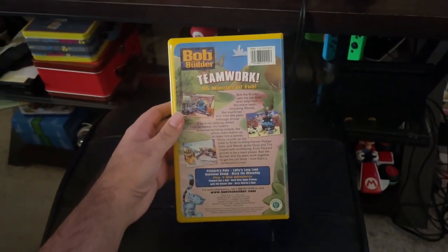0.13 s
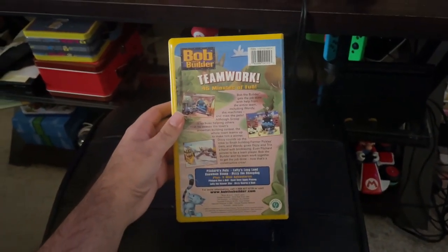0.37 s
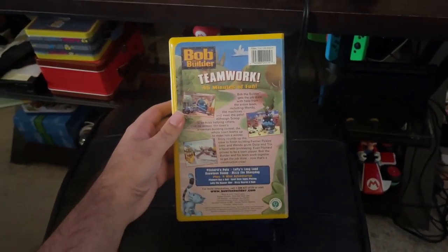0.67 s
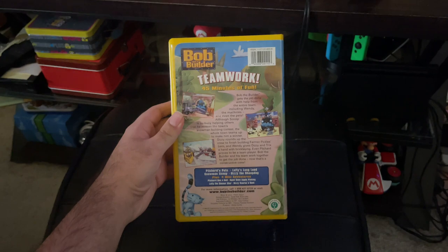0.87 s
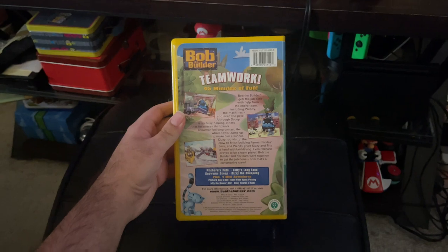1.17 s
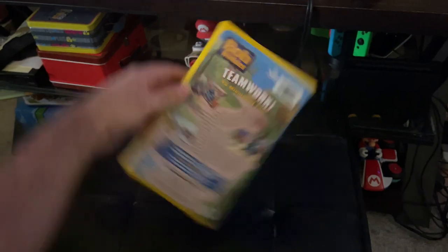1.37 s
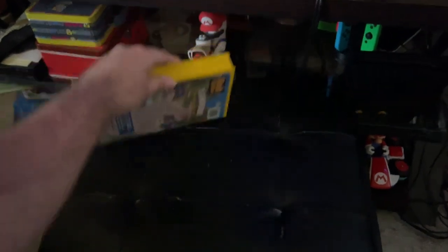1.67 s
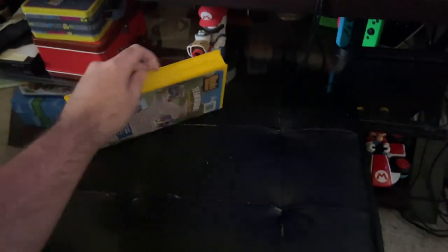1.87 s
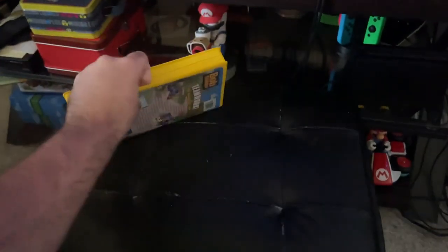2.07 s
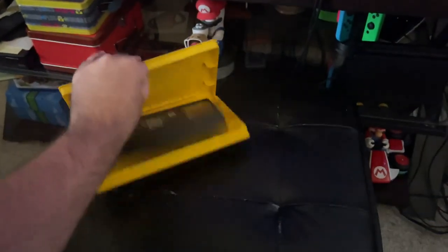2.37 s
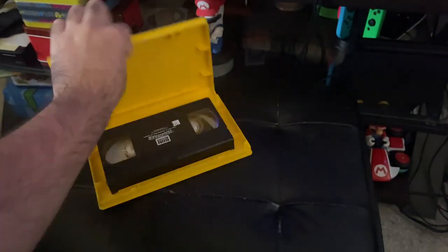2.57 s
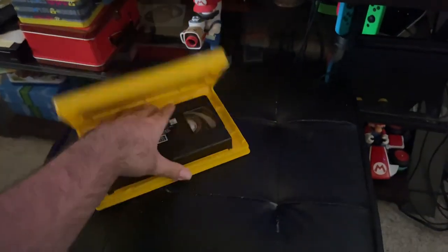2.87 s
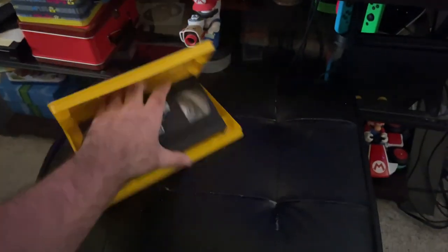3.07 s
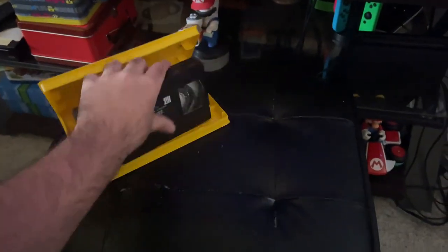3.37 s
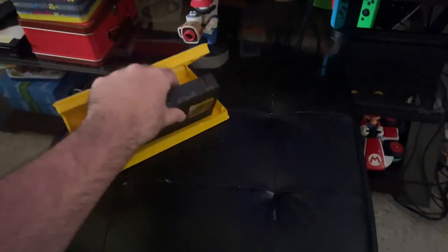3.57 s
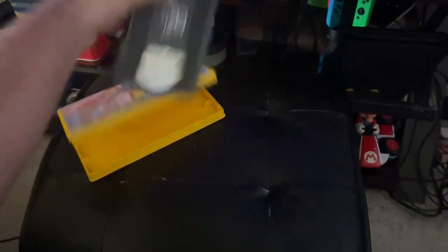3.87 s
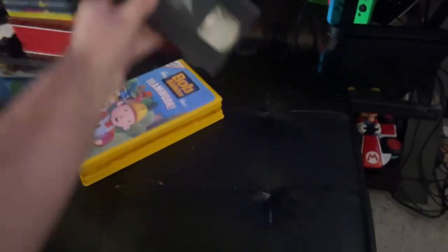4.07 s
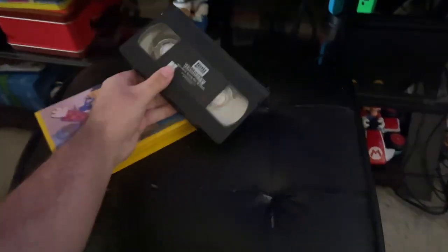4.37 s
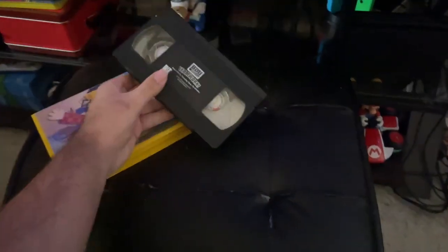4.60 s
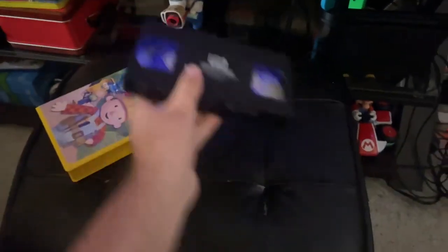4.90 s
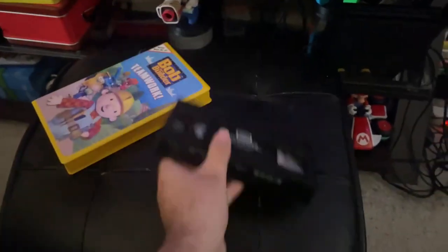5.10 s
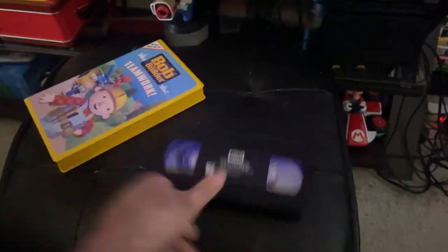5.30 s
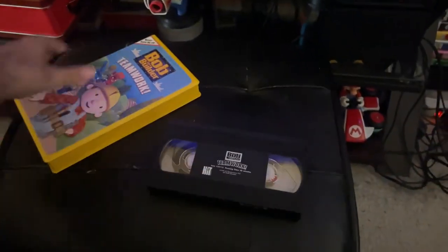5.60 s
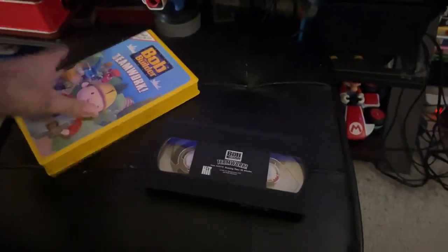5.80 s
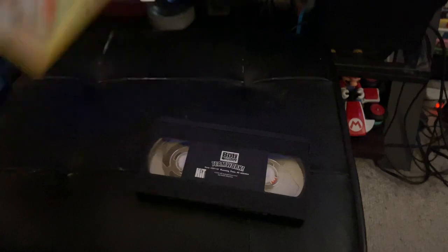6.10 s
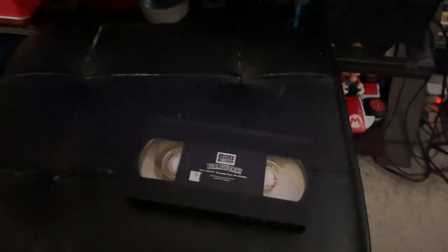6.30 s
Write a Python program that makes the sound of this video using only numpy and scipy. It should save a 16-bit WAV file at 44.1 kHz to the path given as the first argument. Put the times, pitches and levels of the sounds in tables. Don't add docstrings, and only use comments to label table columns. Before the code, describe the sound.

Very near the microphone, a hollow plastic case is turned and set down with light knocks, then pops open with a boom and a burst of sharp snaps. Fingers rub, the cassette clicks free, the lid claps shut, and the cassette lands with a clack and soft thump. Faint rustles follow as the case is taken away. A small furnished room answers briefly over a faint low hum.

```python
import sys
import numpy as np
from scipy import signal
from scipy.fft import rfft, irfft
from scipy.io import wavfile
from scipy.ndimage import uniform_filter1d

SR = 44100
rng = np.random.default_rng(int(sys.argv[2]) if len(sys.argv) > 2 else 0)


def to_linear_factor(level_db):
    exponent = np.asarray(level_db, float) / 20
    return 10 ** exponent


def put_to_file(sound):
    columns = np.atleast_2d(sound).T
    safe = np.clip(columns, -1, 1)
    whole_steps = np.round(safe * 32767)
    wavfile.write(sys.argv[1], SR, whole_steps.astype(np.int16))


N = 284445
HZ = np.fft.rfftfreq(N, 1 / SR) + 1e-3
OPPOSED = np.array([[1], [-1]])

# (pitch [Hz], level [dB], t60 [s])
BOX_MODES = [(190, -3, .07), (240, -1, .06), (305, 0, .05), (390, 0, .06), (455, 0, .06), (525, 1, .045),
             (610, -1, .035), (720, -6, .035), (1350, -9, .04), (1600, -11, .03)]


def level(x):
    return x / np.sqrt(np.mean(x ** 2))


def across(table):
    hz, value = np.transpose(table)
    return np.interp(np.log(HZ), np.log(hz), value)


def band(x, lo_hz, hi_hz):
    return signal.sosfilt(signal.butter(2, [lo_hz, hi_hz], "band", fs=SR, output="sos"), x)


def ring(x, hz, t60_s):
    r = np.exp(-np.log(1000) / (t60_s * SR))
    w = 2 * np.pi * hz / SR
    return signal.lfilter([0, r * np.sin(w)], [1, -2 * r * np.cos(w), r * r], x)


def add(out, start_s, x):
    i = int(start_s * SR)
    out[..., i:i + x.shape[-1]] += x[..., :N - i]


def drift(samples):
    return level(uniform_filter1d(rng.standard_normal(N), size=samples))


def grit(spread_db):
    size_db = np.minimum(spread_db * rng.exponential(size=N), 15)
    return level(rng.standard_normal(N) * to_linear_factor(size_db))


def shell(x, plain_db):
    # (centre [Hz], width [Hz], level [dB])
    resonances = [(1530, 1400, 4.5), (2530, 1800, 0), (4390, 600, 13.5), (5820, 2100, 17.5),
                  (9180, 500, -20.5), (10630, 2500, 24.5)]
    modes = sum(to_linear_factor(db) * w / SR * ring(x, f, 2.2 / max(w, 400)) for f, w, db in resonances)
    return level(level(modes) + to_linear_factor(plain_db) * x)


def three_bands(x):
    low = across([(500, 0), (900, 1), (1800, 1), (4500, 0)])
    top = across([(6500, 0), (9500, 1)])
    middle = across([(1800, 0), (4500, 1)]) - top
    spectrum = rfft(x)
    return np.array([level(irfft(spectrum * share, N)) for share in (low, middle, top)])


def air():
    # (frequency [Hz], density [dB per Hz])
    spectrum_db = [(15, -63), (25, -34.5), (50, -6), (62, -2.5), (72, -7.5), (82, -7), (177, -26),
                   (197, -23), (472, -32), (590, -23), (660, -28), (741, -24.5), (1050, -44.5),
                   (14000, -53.5)]
    # (frequency [Hz], side minus mid [dB])
    side_db = [(60, -12.5), (110, -22.5), (200, -8), (380, -3.5), (700, -2), (1290, -3), (2380, 3.5),
               (4400, -1.5), (8120, -6), (15000, -9)]
    air_db, waver_db, murmur_db = -66.5, 0.8, 2.5
    mid, side = rfft(rng.standard_normal((2, N))) * to_linear_factor(across(spectrum_db))
    side = side * to_linear_factor(across(side_db))
    both = np.array([mid + side, mid - side])
    centres_hz = 350 * 1.2 ** np.arange(7)
    murmurs = [across([(hz / 1.2, 0), (hz, 1), (hz * 1.2, 0)]) for hz in centres_hz]
    total = irfft(both * (1 - sum(murmurs)), N) * to_linear_factor(waver_db * drift(3500))
    for murmur in murmurs:
        total = total + irfft(both * murmur, N) * to_linear_factor(murmur_db * drift(3500))
    return to_linear_factor(air_db) * level(total)


def walls():
    # (centre [Hz], t60 [s], level [dB], share unlike in left and right)
    echo_bands = [(98, 0.31, -8.5, .05), (426, 0.16, -10, .35), (1500, 0.15, -7.5, 1),
                  (4800, 0.15, -11.5, 0.9), (10900, 0.065, -14.5, 0.18)]
    build_s = 0.0065
    t, tail = np.arange(SR // 2) / SR, 0
    for hz, t60_s, db, unlike in echo_bands:
        mid, side = (band(rng.standard_normal(len(t)), hz / 2, min(2 * hz, 15000)) for _ in range(2))
        fade = np.exp(-np.log(1000) * t / t60_s) * np.minimum(t / build_s, 1)
        both = mid + unlike * side * OPPOSED
        tail = tail + to_linear_factor(db) * both * fade / np.sqrt(np.sum(fade ** 2))
    return tail


def room(x):
    places = 9
    step = N // places + 1
    fade = np.hanning(2 * step)
    wide = np.r_[np.zeros(step), x, np.zeros(2 * step)]
    out = np.zeros((2, len(wide) + SR))
    for i in range(0, N + step, step):
        echo = signal.fftconvolve((wide[i:i + 2 * step] * fade)[None], walls(), axes=1)
        out[:, i:i + echo.shape[1]] += echo
    return out[:, step:step + N]


def touch(start_s, end_s):
    t, let_go_s = np.arange(N) / SR, 0.025
    return np.clip(np.minimum(t - start_s, end_s - t) / let_go_s + 1, 0, 1)


def ease(start_s, hardest_s, end_s):
    return np.interp(np.arange(N) / SR, [start_s, hardest_s, end_s], [1, 0, 1])


def wander(x):
    shift_db, total = 2.6, 0
    for hz in np.geomspace(600, 9000, num=13):
        total = total + band(x, hz / 1.12, hz * 1.12) * to_linear_factor(shift_db * drift(700))
    return level(total)


def rub():
    # (touch [s], hardest [s], let go [s], rumble [dB], hiss over rumble [dB])
    drags = [(1.25, 1.286, 1.44, -64, -29), (1.53, 1.644, 1.65, -63, -12.5), (1.7, 1.725, 1.907, -41, -31),
             (2.03, 2.06, 2.23, -55, -14.5), (2.335, 2.345, 2.36, -45, -5),
             (2.395, 2.41, 2.5, -28.5, -18.5), (2.5, 2.52, 2.56, -38, -12), (2.56, 2.59, 2.71, -42, -4),
             (2.67, 2.726, 2.77, -45, -13.5), (3.26, 3.28, 3.325, -45, -21),
             (3.355, 3.38, 3.75, -47, -16.5), (3.52, 3.555, 3.6, -36, -4), (3.7, 3.73, 3.76, -47, -18),
             (3.75, 3.77, 3.83, -47, -36), (3.93, 3.985, 4.0, -71, 3), (4.22, 4.225, 4.26, -70, -8),
             (4.52, 4.54, 4.67, -54, -11), (5.17, 5.172, 5.2, -42, -12), (5.18, 5.2, 5.33, -44, -6),
             (5.22, 5.27, 5.366, -41, -14), (5.47, 5.49, 5.61, -54, -24.5), (4.895, 4.91, 4.94, -66, -7),
             (5.075, 5.085, 5.13, -70, -6)]
    # (touch [s], hardest [s], let go [s], rumble [dB], hiss over rumble [dB])
    slides = [
        (0.9, 1.0, 0.97, -76, -31),
        (2.99, 3.04, 3.38, -55.5, -8.5),
        (3.08, 3.17, 3.24, -54.5, -10.5),
        (4.69, 4.75, 4.76, -61, -9),
        (5.72, 5.8, 6.03, -58.5, -20.5),
        (5.93, 5.99, 6.046, -52, -5),
        (6.08, 6.23, 6.46, -60, -12),
        (6.345, 6.37, 6.35, -61, 0),
        (6.37, 6.42, 6.36, -56, -4.5),
        (5.8, 5.85, 5.97, -61.5, -8.5),
    ]
    # (touch [s], hardest [s], let go [s], level [dB])
    palms = [
        (0.8, 1.2, 1.2, -87.5),
        (3.13, 3.186, 3.215, -64),
        (3.262, 3.298, 3.37, -56),
        (3.93, 3.98, 4.02, -72.5),
        (4.5, 4.578, 4.75, -71),
        (4.884, 4.922, 4.94, -76),
        (5.827, 5.845, 5.9, -66),
        (5.915, 5.952, 5.9, -58.5),
        (6.071, 6.118, 6.2, -74),
    ]
    ease_rumble_db, ease_hiss_db, ease_palm_db = 10, 12, 13.5
    dull, hiss, rumble, top = np.zeros((4, N))
    # strokes, lower mids over hiss [dB], top over hiss [dB]
    for strokes, low_db, top_db in ((drags, 0.5, -8.5), (slides, -2.5, 6)):
        for start_s, hardest_s, end_s, db, hiss_db in strokes:
            contact, light = touch(start_s, end_s), ease(start_s, hardest_s, end_s)
            grain = contact * to_linear_factor(db + hiss_db - ease_hiss_db * light)
            dull += to_linear_factor(low_db) * grain
            hiss += grain
            top += to_linear_factor(top_db) * grain
            rumble += contact * to_linear_factor(db - ease_rumble_db * light)
    for start_s, hardest_s, end_s, db in palms:
        dull += touch(start_s, end_s) * to_linear_factor(db - ease_palm_db * ease(start_s, hardest_s, end_s))
    patchy = to_linear_factor(1.6 * np.array([drift(250) for _ in range(4)]))
    low, mid, high = three_bands(shell(grit(3.2), 4))
    low, mid = wander(low), wander(mid)
    shake = rng.standard_normal(N) * patchy[3]
    body = level(sum(to_linear_factor(db) * ring(shake, f, t60_s) for f, db, t60_s in BOX_MODES))
    body = body + to_linear_factor(-6.0) * level(band(shake, 50, 470))
    grains = dull * low * patchy[0] + hiss * mid * patchy[1] + top * high * patchy[2]
    return grains + to_linear_factor(-5.0) * rumble * body


def sizzle():
    # (time [s], level [dB], length [ms])
    puffs = [(1.97, -65, .6), (2.261, -56, .6), (2.433, -48, .6), (2.933, -55, 3.5), (3.264, -67.5, 2),
             (3.402, -66, 3), (3.515, -66, 6), (3.53, -60, 58), (3.541, -48.5, 5), (3.554, -52.5, 5.2),
             (3.564, -46, 4), (4.363, -66, 1), (4.405, -50, 2), (2.618, -60, 4), (5.184, -56, .6),
             (5.274, -59, .6), (5.364, -69, 0.55)]
    gain_db, decay_s = 42, 0.0011
    shape, t = np.zeros(N), np.arange(4000) / SR
    for s, db, ms in puffs:
        add(shape, s, to_linear_factor(db + gain_db) * np.exp(-np.maximum(t - ms / 1000, 0) / decay_s))
    top = across([(12600, 0), (13200, 1), (16200, 1), (16500, 0)])
    return shape * level(irfft(rfft(grit(2.1)) * top, N))


def rings():
    # (time [s], level [dB], pitch [Hz], pitch [Hz])
    box_rings = [(1.373, -51, 1970, 1120), (1.731, -50, 2870, 950), (1.738, -44, 4770, 3620),
                 (1.764, -42, 1010, 3550), (1.963, -56, 1510, 3330), (1.97, -46, 1625, 4220),
                 (2.006, -56, 1400, 5900), (2.263, -30.5, 2470, 1530), (2.334, -34, 840, 4960),
                 (2.41, -44, 2440, 4705), (2.433, -20.5, 5340, 4540), (2.435, -25, 6000, 1530),
                 (2.447, -29.5, 6000, 1484), (2.495, -39, 3540, 4480), (2.523, -45.5, 1798, 3300),
                 (2.589, -44, 1660, 3456), (2.618, -25.5, 4434, 3440), (2.62, -30, 5560, 9496),
                 (2.855, -52, 4100, 5240), (2.933, -29.5, 1570, 3750), (2.979, -48, 1626, 4500)]
    # (time [s], level [dB], pitch [Hz], pitch [Hz])
    tape_rings = [(3.264, -47.5, 3470, 5400), (3.402, -28, 4390, 5415), (3.508, -35, 717, 2994),
                  (3.543, -26, 5330, 9560), (3.555, -30.5, 3394, 5370), (3.565, -33, 2130, 5320),
                  (3.677, -51, 1884, 2690), (3.752, -45.5, 1904, 3500), (3.839, -38, 5610, 2045),
                  (4.13, -75, 741.5, 878), (4.275, -68, 1035, 1550), (4.296, -34, 1486, 2700),
                  (4.308, -35, 784, 1760), (4.364, -24, 1308, 3340), (4.372, -33.5, 1410, 2400),
                  (4.408, -28, 1361, 2575), (4.412, -32, 1319, 2535), (5.17, -38, 2247, 5512),
                  (5.184, -35, 5590, 2250), (5.209, -44, 4209, 1927), (5.248, -38.5, 3740, 1950),
                  (5.274, -42.5, 1930, 5930), (5.364, -32.5, 4470, 1790), (5.384, -40, 4050, 1750),
                  (5.455, -48.5, 5340, 1725), (5.97, -58, 1350, 1701), (6.24, -62, 688, 3220),
                  (6.3, -70.5, 1600, 1450), (6.403, -46, 8550, 8107)]
    t60_s, rise_s, gain_db, loss_power = 0.037, 0.0016, 9.5, 0.35
    out, t = np.zeros(N), np.arange(5000) / SR
    for s, db, one_hz, two_hz in box_rings + tape_rings:
        for hz, pitch_db in ((one_hz, 0), (two_hz, -2.5)):
            decay = to_linear_factor(-60 * t / t60_s * (hz / 2000) ** loss_power)
            fade = np.minimum(t / rise_s, 1) * decay
            add(out, s, to_linear_factor(db + pitch_db + gain_db) * fade * np.sin(2 * np.pi * hz * t))
    return out


def cracks():
    # (time [s], peak [dB], lower mids [dB], top [dB])
    turn_cracks = [(1.3708, -38.5, 8, -5.5), (1.4624, -34, -7, -13), (1.6318, -63.5, 16, -18),
                   (1.7225, -42, -5, -3), (1.73, -31, -2, -14), (1.7385, -27, -5, -5),
                   (1.797, -41.5, 3, -24), (1.838, -58, 0, -12), (1.876, -56, -14, 4), (1.89, -41, 0, -16),
                   (1.96, -39.5, -6, 0), (1.97, -32, 3, 2.5), (2.006, -35, -7, -14)]
    # (time [s], peak [dB], lower mids [dB], top [dB])
    open_cracks = [(2.2623, -17, -4, -5), (2.336, -17.5, 4, -2), (2.363, -27, -4, -13),
                   (2.41, -29, -11.5, -12), (2.433, -12.5, -3, 0), (2.438, -13, -6, 0),
                   (2.4458, -19.5, -12, 2), (2.399, -39, 0, -4), (2.425, -31, -11, -12),
                   (2.524, -32, -3, -10.5), (2.5877, -39.5, 9, -3), (2.855, -39, -2, -26),
                   (2.917, -40, 8, -4), (2.979, -33.5, -2, -2), (3.0694, -53.5, 11.5, -10),
                   (3.244, -50, 7, -15), (3.264, -31.5, -7, -7), (3.279, -51, -10, 3),
                   (3.367, -44.5, -14, 1), (3.155, -46, -5, 3), (3.297, -54.5, 15.5, -10),
                   (3.517, -31.5, 3.5, 7), (3.554, -24, -4, 3), (3.5652, -19, -5, -6),
                   (3.677, -44.5, 9.5, 5), (3.7373, -43.5, 5.5, -8), (3.7517, -27.5, -2, 1),
                   (3.8383, -19, -8.5, 3)]
    # (time [s], peak [dB], lower mids [dB], top [dB])
    lay_cracks = [(4.073, -76, 10, -12), (4.2, -69.5, 10, -14.5), (4.2722, -55, -4.5, 8),
                  (4.2963, -33.5, 12, -14), (4.306, -38.5, 10.5, -1.5), (4.4046, -21, 1.5, -1),
                  (4.409, -30, 10, -26), (4.505, -39, -5, -8.5), (4.79, -63, 3, -7), (4.807, -65, -1, 1),
                  (4.632, -46.5, 5, -20), (5.151, -40.5, 5, -8.5), (5.161, -40.5, 3, 8.5),
                  (5.274, -32, -6, 2.5), (5.363, -15, -3, -1), (5.383, -29, 4.5, -9),
                  (5.526, -51.5, 2.5, -16), (5.757, -58, -12, -1), (5.7719, -46.5, -32, -3),
                  (5.798, -64, -13, 10), (5.8379, -44, 1.5, -2), (6.2418, -63, -8, -20),
                  (6.351, -41, -5, -4), (6.02, -58, -7, 4), (6.414, -44, -5, -1), (6.44, -44, 3.5, -8)]
    # (time [s], peak [dB], lower mids [dB], top [dB], length [ms])
    scrapes = [(1.7596, -33.5, 5.5, -5, 9), (2.2662, -25, 5.5, -7, 6.6), (2.434, -14.5, -5.5, -1, 11.5),
               (2.4916, -23.5, -2, -3, 8), (2.615, -16, -5, 1.5, 7.9), (2.93, -24.5, 4, -1, 5.9),
               (3.389, -30, -1.5, 1.5, 11.6), (3.4004, -20, -5.5, -4, 5.4), (3.506, -26, 0, -2, 4.7),
               (3.541, -18, -12.5, -5, 5), (4.361, -22, 10, -4, 4.5), (5.166, -33.5, -2, -6, 8.7),
               (5.1791, -19, -2, 1, 8.75), (5.245, -28, -2, -7, 6), (5.451, -33.5, -5.5, 0, 10.2),
               (5.94, -49, 1, -10, 6.2), (5.883, -48.5, 1.5, -3, 8.3), (6.398, -43.5, -15, 0, 14.5)]
    # (time [s], left minus right [dB])
    hands_pan = [
        (1.3, 1.5),
        (2.5, 2),
        (3.7, 2.5),
        (4.3, 2.5),
        (5.3, 1.5),
        (6.4, 1.5),
    ]
    crack_ms, creep_s, creep_db = 1.5, 0.0096, -25
    shape, t = np.zeros((3, 2, N)), np.arange(6000) / SR
    creak = to_linear_factor(creep_db - 8.7 * np.arange(700)[::-1] / SR / creep_s)
    short = [(*row, crack_ms) for row in turn_cracks + open_cracks + lay_cracks]
    for s, db, low_db, top_db, ms in short + scrapes:
        hold_s = max(ms, .2) / 1000
        pan_db = np.interp(s, *np.transpose(hands_pan))
        after = np.maximum(t - hold_s, 0)
        rise = np.minimum(t / (.55 * hold_s + 0.0005), 1) ** 2
        rattle = to_linear_factor(-18.5) * np.exp(-after / 0.032)
        burst = rise * (np.exp(-after / 0.0024) + rattle)
        gains = to_linear_factor(db - 7.5 + np.add.outer([low_db, 0, top_db], [pan_db / 2, -pan_db / 2]))
        add(shape, s, gains[..., None] * burst)
        add(shape, s - len(creak) / SR, gains[..., None] * creak)
    mid, side = (three_bands(shell(grit(2.6), -4))[:, None] for _ in range(2))
    return np.sum(shape * (mid + 0.42 * side * OPPOSED), axis=0)


def knocks():
    # (time [s], peak [dB], main pitch [Hz], seat thump [dB])
    box_knocks = [(1.372, -25, 372, -27), (1.444, -37.5, 369, -7.5), (1.466, -35.5, 383, -21),
                  (1.635, -43.5, 380, -21.5), (1.723, -33, 354, -12), (1.733, -23, 367, -12),
                  (1.747, -24.5, 292, -12), (1.763, -19, 341, -29), (1.794, -32.5, 435, -40.5),
                  (1.836, -37.5, 293, -36.5), (1.894, -36, 389, -19.5), (1.962, -33.5, 457, -30.5),
                  (1.967, -25.5, 445, -32), (2.008, -33, 435, -25.5), (2.158, -43, 440, -22),
                  (2.264, -4, 330.4, -23.5), (2.281, -22.5, 230, -28.5), (2.335, -11, 421, -16),
                  (2.361, -27, 198, -13.5), (2.419, -31.5, 206, -30.5), (2.439, -18.5, 467.3, -27),
                  (2.496, -21.5, 319, -14), (2.618, -23, 457, -44.5), (2.724, -55.5, 232, -20),
                  (2.858, -40.5, 229, -10), (2.918, -36.5, 400, -20), (2.934, -18.5, 391, -23),
                  (2.956, -23, 404, -6.5), (2.968, -31, 318, -8), (3.071, -47, 295, -15)]
    # (time [s], peak [dB], main pitch [Hz], seat thump [dB])
    lift_knocks = [(3.193, -46, 552, -24), (3.268, -36.5, 412, -23.5), (3.292, -36, 560, -31.5),
                   (3.401, -19, 236.7, -16), (3.508, -21, 362, -20.5), (3.523, -20.5, 203.9, -22),
                   (3.561, -17, 330, -17), (3.68, -34.5, 419, -29), (3.751, -32, 355.5, -36),
                   (3.84, -28.5, 325.8, -26), (3.842, -29.5, 609, -31), (4.297, -16, 442, -22),
                   (4.308, -16.5, 526, -26.5), (4.365, -4, 399.6, -28.5), (4.4092, -15, 420, -17),
                   (4.417, -19, 250, -20), (4.635, -46, 452, -21.5), (4.738, -49, 323, -36),
                   (4.765, -47, 223.4, -40)]
    # (time [s], peak [dB], main pitch [Hz], seat thump [dB])
    lay_knocks = [(5.152, -36, 330, -14), (5.169, -29.5, 230, -21), (5.184, -31.5, 350, -32),
                  (5.245, -33.5, 245, -43), (5.275, -58, 350, -5), (5.363, -18, 450, -3.5),
                  (5.448, -29.5, 360, -1), (5.713, -50, 234, -2), (5.742, -42.5, 218, -14.5),
                  (5.761, -55.5, 198.7, 13), (5.842, -36.5, 195.2, -9), (5.856, -46, 228, -2),
                  (5.965, -41.5, 403, -7), (6.234, -57, 545, -1), (6.29, -50.5, 151, -0.5),
                  (6.315, -51, 163, -1), (6.349, -51, 487, -5), (6.402, -52, 358, -6.5)]
    hardness = (0.75, 0.53, 0.81)
    crest_ms, softer_ms_per_db = 1.63, 0.26
    box_db, push_s = -14, 0.00088
    seat_hz, seat_sag_s, seat_t60_s = 50, .0075, 0.16
    blows = box_knocks + lift_knocks + lay_knocks
    shares = np.repeat(hardness, [len(box_knocks), len(lift_knocks), len(lay_knocks)])
    out, chance = np.zeros(N), rng.standard_normal((len(blows), 2 * len(BOX_MODES)))
    width = int(push_s * SR)
    push = np.r_[np.hanning(width) * 2 / width, np.zeros(9000)]
    t = np.arange(len(push)) / SR
    for (s, db, hz, thump_db), c, share in zip(blows, chance, shares):
        ms = share * (crest_ms - softer_ms_per_db * db)
        age = t / (np.clip(ms, 2.1, 6.5) / 1000)
        phase = 2 * np.pi * np.cumsum(hz * (.9 + .4 * np.exp(-age))) / SR
        flex = np.sin(phase) + to_linear_factor(-7.5) * np.sin(0.71 * phase + 2 * c[0])
        blow = band(age ** 2 * np.exp(2 * (1 - age)) * flex, 125, 6000)
        swell = np.minimum(age, 1)
        for (f, mode_db, t60_s), jitter, size in zip(BOX_MODES, c[::2], c[1::2]):
            blow += swell * size * to_linear_factor(mode_db + box_db) * ring(push, f * (1 + 0.011 * jitter), t60_s)
        skin = np.sin(2 * np.pi * np.cumsum(seat_hz + hz * np.exp(-t / seat_sag_s)) / SR)
        seat = to_linear_factor(-3) * ring(push, 110, 0.12) + to_linear_factor(2.5) * skin * to_linear_factor(-60 * t / seat_t60_s)
        blow += swell * to_linear_factor(thump_db) * seat
        add(out, s, to_linear_factor(db) * blow)
    return out


def scene():
    near = cracks() + knocks() + rub() + rings()
    return near + room(near.mean(axis=0)) + air() + sizzle()


def low_pass(x):
    return signal.sosfilt(signal.butter(12, 16480, fs=SR, output="sos"), x)


def record(dry):
    # (frequency [Hz], level [dB])
    mic_db = [(20, -17), (50, -3.5), (9500, -5.5), (9800, -7), (10200, -32), (10700, -3), (11900, -1),
              (12700, -22), (14000, -31), (16000, -36.5)]
    # (frequency [Hz], left minus right [dB])
    lean_db = [(60, 1), (110, 0), (200, 0.5), (380, -2.5), (700, 1.5), (1290, -1), (2380, 0.5), (4400, -1),
               (8120, -0.5), (15000, -1.5)]
    # (frequency [Hz], left leads [rad])
    lead_rad = [(1, 0), (300, .1), (700, .8), (1550, .6), (2600, 1.4), (5900, .7), (7400, 1), (8900, -.4),
                (10250, -np.pi), (11500, -5.7), (13000, -6.9)]
    # (frequency [Hz], level [dB])
    top_db = [(12900, 0), (13400, -15), (16200, -15), (16500, -70)]
    half = OPPOSED / 2
    ports = to_linear_factor(across(mic_db) + half * across(lean_db))
    ports = ports * np.exp(1j * half * np.interp(HZ, *np.transpose(lead_rad)))
    limited = 1.239 * np.tanh(irfft(rfft(dry) * ports, N) / 0.68)
    return low_pass(irfft(rfft(limited) * to_linear_factor(across(top_db)), N))


dry = scene()
out = record(dry)
put_to_file(out)
```